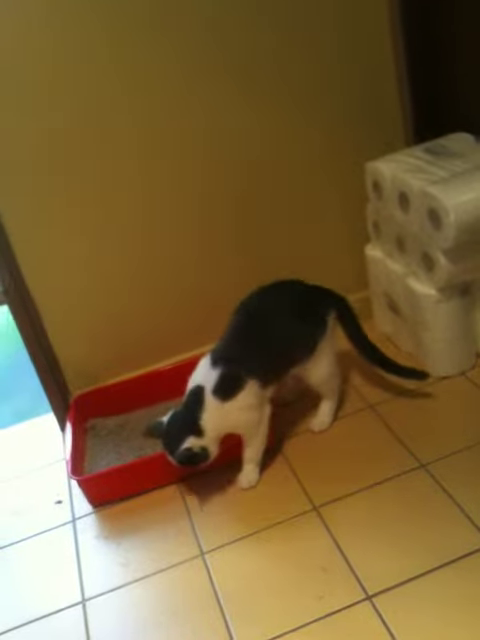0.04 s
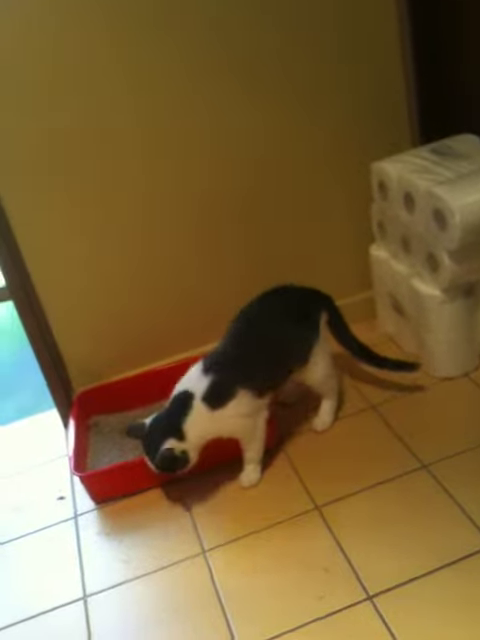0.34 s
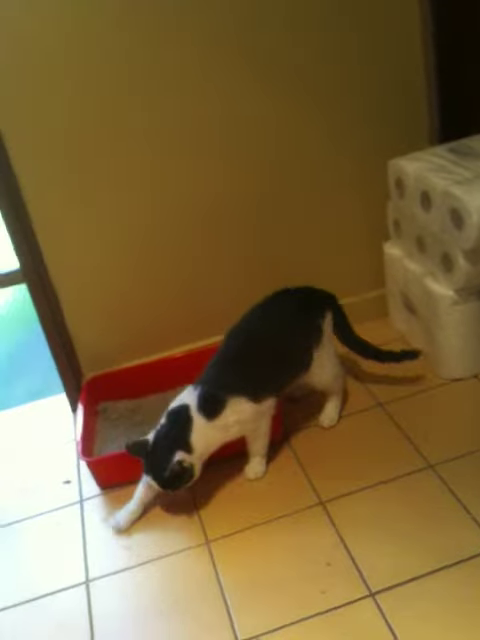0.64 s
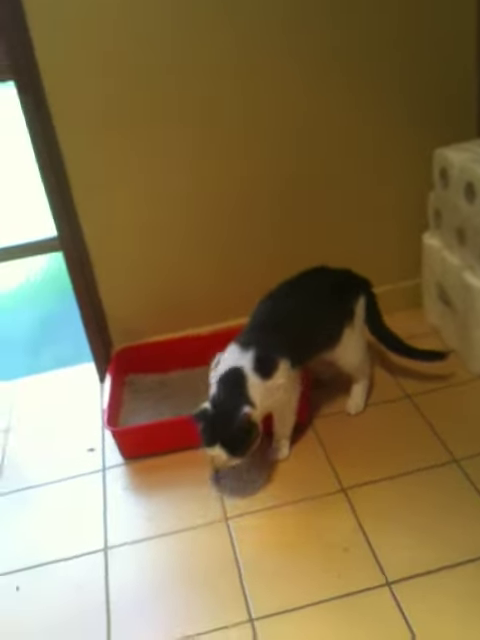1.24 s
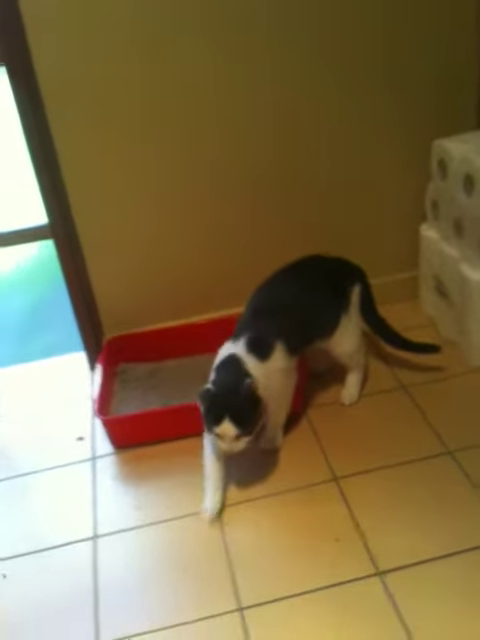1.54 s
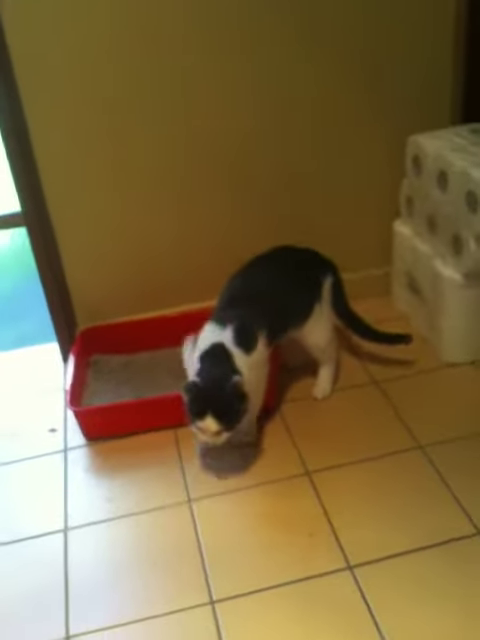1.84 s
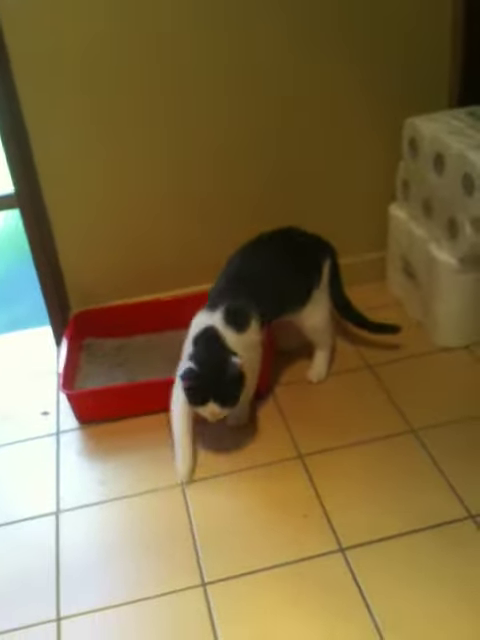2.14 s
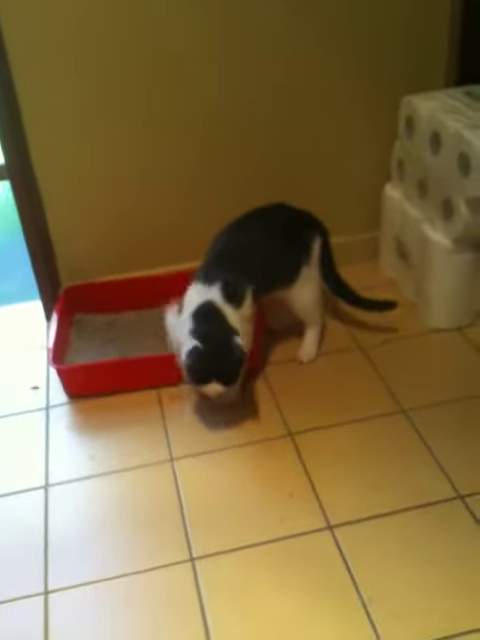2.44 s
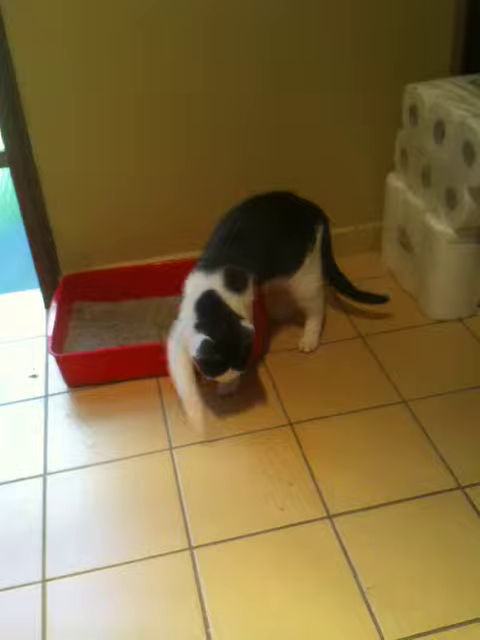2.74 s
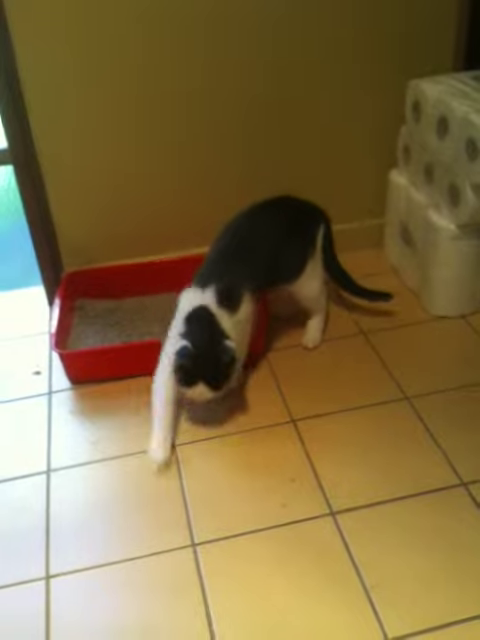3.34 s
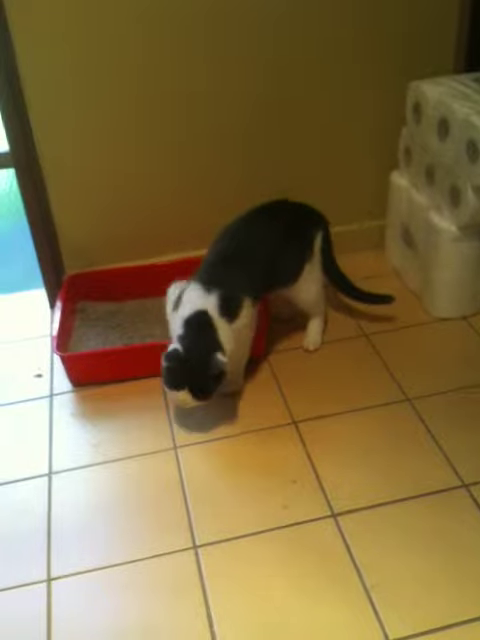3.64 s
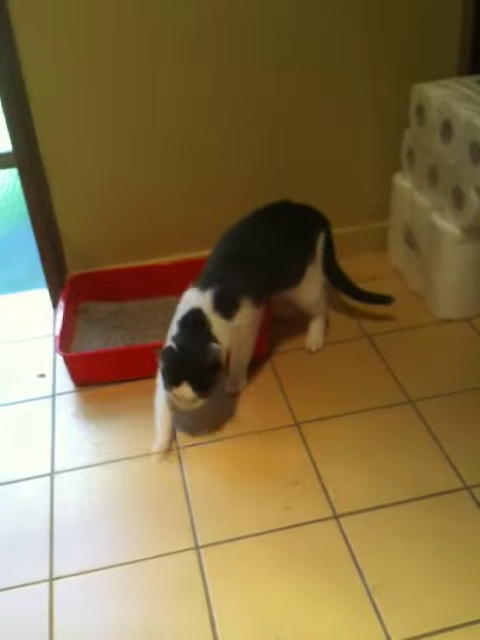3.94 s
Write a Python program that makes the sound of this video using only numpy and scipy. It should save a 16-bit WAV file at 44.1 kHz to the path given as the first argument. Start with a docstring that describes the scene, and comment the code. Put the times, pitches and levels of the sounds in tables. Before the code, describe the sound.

A cat's paw scraping a tiled floor and knocking against a plastic litter tray.

```python
"""Cat pawing beside a litter tray

A cat swipes a front paw over a tiled floor in a small hard room. Each swipe is a faint brush as the
leg reaches out, a hollow knock as the returning paw excites the modes of the plastic tray, and a short
gritty scrape of friction. Soft footfalls and one dull tap lie over quiet room noise and hiss."""
import sys
import numpy as np
from scipy import signal
from scipy.fft import rfft
from scipy.io import wavfile
from scipy.ndimage import uniform_filter1d

SR = 44100
rng = np.random.default_rng(int(sys.argv[2]) if len(sys.argv) > 2 else 0)


def digitize_waveform(pressure):
    """Quantize a signal to 16-bit integers and store it at the path in sys.argv[1].

    Rows of a 2-D input are taken as channels; values are limited to [-1, 1].
    """
    field = np.atleast_2d(pressure).T
    bounded = np.clip(field, -1, 1)
    quanta = np.round(bounded * 32767).astype(np.int16)
    wavfile.write(sys.argv[1], SR, quanta)


N = 176400


def amp(db):
    """Amplitude ratio: a factor of ten for every 20 dB."""
    return 10 ** (np.asarray(db) / 20)


def unit_rms(x):
    """Normalisation to unit mean power."""
    return x / np.sqrt(np.mean(x ** 2) + 1e-30)


def unit_energy(x):
    """Normalisation to a unit sum of squares."""
    return x / np.linalg.norm(x)


def curve_at(points, hz):
    """Linear interpolation on a logarithmic frequency axis."""
    frequencies, values = np.transpose(points)
    return np.interp(np.log(hz + 1), np.log(frequencies), values)


def add(mix, start_s, sound):
    """Superposition: a sound joins the mix at its start time."""
    part = mix[max(round(start_s * SR), 0):][:len(sound)]
    part += sound[:len(part)]


def colour(x, spectrum, size=4096):
    """Minimum-phase filtering: a causal response of unit energy imposes the spectral shape."""
    log_gain = np.log(amp(curve_at(spectrum, abs(np.fft.fftfreq(size, 1 / SR)))))
    response = np.exp(np.conj(signal.hilbert(log_gain)))
    taps = np.fft.ifft(response).real[:size // 2]
    return signal.fftconvolve(x, unit_energy(taps))[:len(x)]


# Spectrum of the room noise. Each row: frequency in Hz, relative level in dB.
NOISE_SPECTRUM = [(20, -45.5), (50, -30), (90, -9), (125, -5), (175, 1.5), (260, -1), (400, -6), (600, -6),
                  (900, -12), (1600, -15.5), (2000, -14), (2200, -10), (2700, -18), (3400, -18),
                  (4500, -23), (7000, -24), (10000, -24), (15500, -25)]


def room_noise(level_db=-68, waver_db=0.5):
    """Amplitude modulation: steady room noise and hiss waver slightly in level."""
    waver = unit_rms(uniform_filter1d(rng.standard_normal(N), size=6000))
    return amp(level_db + waver_db * waver) * colour(rng.standard_normal(N), NOISE_SPECTRUM)


# Spectrum of the tap. Each row: frequency in Hz, relative level in dB.
TAP_SPECTRUM = [(40, -43), (110, -14), (180, 2), (350, -2.5), (700, -8), (1200, -17), (2000, -28),
                (6000, -62)]


def tap(start_s=0.6095, level_db=-61):
    """Impulse response: one damped pulse close by, dull and without reverberation."""
    pulse = np.zeros(N)
    add(pulse, start_s, amp(level_db) * unit_rms(signal.unit_impulse(SR // 10)))
    return colour(pulse, TAP_SPECTRUM)


# Footfalls. Each row: start in seconds, level in dB.
FOOTFALLS = [(.645, -63.5), (0.919, -58), (1.123, -63), (1.161, -65), (2.788, -65)]
# Spectrum of a footfall. Each row: frequency in Hz, relative level in dB.
FOOTFALL_SPECTRUM = [(50, -36), (120, -14), (175, 3), (300, -10), (600, -50), (3000, -44)]


def footfalls(decay_s=0.045):
    """Cushioned impact: the pads make low, exponentially dying thuds as the cat shifts its weight."""
    t, thuds = np.arange(SR // 4) / SR, np.zeros(N)
    for start_s, db in FOOTFALLS:
        add(thuds, start_s, amp(db) * rng.standard_normal(len(t)) * np.exp(-t / decay_s))
    return colour(thuds, FOOTFALL_SPECTRUM)


def swell(peak_s, half_s):
    """Gaussian envelope of a stroke's pressure; the half length is one standard deviation."""
    return np.exp(-0.5 * ((np.arange(N) / SR - peak_s) / half_s) ** 2)


# Brushing strokes. Each row: peak time in seconds, half length in seconds, level in dB.
BRUSHES = [(0.798, 0.041, -71), (1.21, 0.036, -67.5), (1.46, 0.2, -69.5), (1.69, 0.031, -94),
           (1.834, 0.042, -66), (2.441, 0.055, -69), (3.03, 0.049, -71.5), (3.646, 0.049, -67)]
# Spectrum of the brushing. Each row: frequency in Hz, relative level in dB.
BRUSH_SPECTRUM = [(100, -27), (400, -0.5), (1000, -3), (1500, -3.5), (2000, -1), (2450, 0.5), (3000, -6),
                  (3500, -5.5), (4500, -19.5), (15000, -25)]


def brushes():
    """Friction noise: fur and pads rub faintly, in proportion to the pressure of each stroke."""
    pressure = sum(amp(db) * swell(peak_s, half_s) for peak_s, half_s, db in BRUSHES)
    return colour(rng.standard_normal(N), BRUSH_SPECTRUM) * pressure


def mode(t, hz, t60):
    """Damped oscillation: a sinusoid that falls 60 dB in t60 seconds."""
    return np.sin(2 * np.pi * hz * t) * np.exp(-np.log(1000) * t / t60)


# Modes of the plastic tray. Each row: frequency in Hz, relative level in dB, T60 in seconds.
TRAY_MODES = [(295, -5, 0.26), (336, -1.5, 0.28), (375, 3.5, 0.2), (525, -3, 0.35), (586, 2.5, 0.19),
              (645, 0, 0.31), (765, -1, 0.25), (880, -8, 0.37), (958, -9, 0.27), (1131, -8.5, 0.32),
              (1348, -5.5, .26), (1690, -8, 0.23), (2260, -8.5, 0.25), (2394, -7.5, 0.36)]
# Standing waves of the room. Each row: frequency in Hz, relative level in dB, T60 in seconds.
ROOM_MODES = [(149.4, -8, 0.44), (185.3, -6.5, 0.3), (216.6, -6, 0.44), (242, -16, 0.4), (422, -5, 0.1),
              (498, -2, 0.17), (687.7, 1, 0.19), (816, -15, 0.22), (1083, 0, 0.12), (1250, -20, 0.15),
              (1440, -6, .25), (1510, -32, 0.31), (1602, -7.5, 0.15), (1790, -12.5, 0.36)]


def ringing():
    """Modal superposition: tray modes start in phase; adjacent room modes start opposed, then swell."""
    t = np.arange(SR // 2) / SR
    tray = [amp(db) * mode(t, hz, t60) for hz, db, t60 in TRAY_MODES]
    room = [amp(db) * mode(t, hz, t60) for hz, db, t60 in ROOM_MODES]
    return unit_energy(sum(tray) + sum(room[::2]) - sum(room[1::2]))


# Reverberation time of the room. Each row: frequency in Hz, T60 in seconds.
ROOM_T60 = [(120, 0.7), (350, 0.29), (900, 0.26), (2400, 0.36), (6000, 0.45), (14000, 0.2)]


def room_tail():
    """Reverberation: half a second of dense reflections, each band decaying at its own rate."""
    hz, t, bands = signal.stft(rng.standard_normal(SR // 2), SR, nperseg=256)
    decay = np.exp(-np.log(1000) * t / curve_at(ROOM_T60, hz)[:, None])
    _, tail = signal.istft(bands * decay, SR, nperseg=256)
    return unit_energy(tail[:SR // 2])


def contact_noise(t, decay_s):
    """Broadband excitation: a brief contact gives exponentially dying noise of unit energy."""
    return unit_energy(rng.standard_normal(len(t)) * np.exp(-t / decay_s))


def rebound(t, delay_s=0.051, half_s=0.0088, centre_hz=227, fall_hz_per_s=1700):
    """Downward chirp: the tray rocks back after a knock with a soft thud of falling pitch."""
    lag = t - delay_s
    cycles = lag * (centre_hz - 0.5 * fall_hz_per_s * lag) + rng.random()
    return np.exp(-0.5 * (lag / half_s) ** 2) * np.sin(2 * np.pi * cycles)


# The seven bands of a knock. Each entry: band edge in Hz.
BAND_EDGES_HZ = [120, 250, 450, 850, 1500, 2800, 5000, 15000]


def equalise(blow, band_db, size=3600, passes=2):
    """Equalisation: smooth filters bring the first 80 ms of a blow towards the given band levels."""
    edges = np.array(BAND_EDGES_HZ)
    centres = np.sqrt(edges[1:] * edges[:-1])
    edge_bins = (edges * size / SR).astype(int)
    for _ in range(passes):
        band_power = np.add.reduceat(abs(rfft(blow[:size])) ** 2, edge_bins)[:-1]
        gain_db = band_db - 10 * np.log10(band_power)
        blow = colour(blow, np.transpose([centres, gain_db]))
    return blow / blow[:size].std() * np.linalg.norm(amp(band_db))


# Dense ringing beneath the tray's modes. Each row: frequency in Hz, relative level in dB.
BODY_SPECTRUM = [(70, -35.5), (150, -7.5), (220, -14.5), (400, -2.5), (600, -0.5), (1000, -7), (2300, -14),
                 (3500, -17), (4500, -23.5), (5800, -29.5), (10000, -26), (15000, -31.5)]
# Paw knocks. Each row: start in seconds, low and high pitch of the struck spot in Hz, their two
# relative levels in dB, push level in dB, rebound level in dB, then seven band levels in dB.
KNOCKS = [(0.8853, 386, 1870, 4, -10, -88, -70, -78, -67.5, -66.5, -79, -71.5, -79.5, -78),
          (1.3213, 931, 1308, -4.5, -9, -87, -46, -51, -52, -46, -50.5, -60, -69, -74.5),
          (1.9344, 395, 1097, 0, -17, -67, -53, -57, -39, -50, -52.5, -57, -67.5, -73),
          (2.556, 533, 1150, -13, -6, -68, -42, -51.5, -39.5, -44, -48, -49.5, -60, -68.5),
          (3.1181, 394, 2324, -2.5, -6, -63, -40.5, -49, -37.5, -42.5, -48.5, -46.5, -56, -67),
          (3.729, 711, 1743, 1, -11, -69, -42.5, -50.5, -42.5, -42, -46, -47.5, -59, -66.5)]


def knocks(attack_s=0.0017, spot_t60=0.12, bass_cut_hz=157, push_hz=50, push_s=0.007):
    """Impact excitation: a slap and a rough contact ring tray and room, each blow on another spot."""
    t, out = np.arange(SR // 2) / SR, np.zeros(N)
    ring, reflections = ringing(), room_tail()
    bass_cut = signal.butter(3, bass_cut_hz, "high", fs=SR, output="sos")
    onset = 1 - np.exp(-t / attack_s)
    push = np.sin(2 * np.pi * push_hz * t) * t / push_s * np.exp(1 - t / push_s)  # paw on the floor
    for start_s, low_hz, high_hz, low_db, high_db, push_db, rebound_db, *band_db in KNOCKS:
        contact = amp(-1.5) * contact_noise(t, decay_s=0.023)
        slap = amp(-11.5) * contact_noise(t, decay_s=0.0057)
        body = colour(reflections + contact + slap, BODY_SPECTRUM)
        spot_low = amp(low_db) * unit_energy(mode(t, low_hz, spot_t60))
        spot_high = amp(high_db) * unit_energy(mode(t, high_hz, spot_t60))
        tones = amp(1.5) * ring + spot_low + spot_high
        blow = equalise(signal.sosfilt(bass_cut, tones * onset + body), np.array(band_db))
        add(out, start_s, blow + amp(push_db) * push + amp(rebound_db) * rebound(t))
    return out


def slips(per_s=2100, spread_db=4):
    """Stick-slip friction: a dense random train of tiny impulses of uneven size."""
    size = amp(spread_db * np.minimum(rng.exponential(1, N), 4))
    polarity = rng.choice([-1, 1], N)
    slipping = rng.random(N) < per_s / SR
    return unit_rms(size * polarity * slipping)


# Scrapes. Each row: peak time in seconds, half length in seconds, pad, claw and grit levels in dB.
SCRAPES = [(0.908, 0.0089, -57, -68, -72.5), (1.429, 0.023, -58.5, -64.5, -76.5),
           (2.04, 0.024, -61, -65.5, -74), (2.674, 0.018, -55, -63.5, -67), (3.229, 0.014, -51, -70, -70.5),
           (3.811, 0.013, -59.5, -62, -75), (3.857, 0.025, -57.5, -61, -71.5)]
# Spectra of pad, claws and grit. Each row: frequency in Hz, relative level in dB.
PAD_SPECTRUM = [(60, -24.5), (180, -13.5), (300, -2.5), (400, 3), (550, -7.5), (750, -0.5), (1300, -9.5),
                (1800, -19), (4000, -34.5), (15000, -58)]
CLAW_SPECTRUM = [(300, -42), (1200, -10), (1900, -1), (2450, 3.5), (2950, -5), (3500, -3.5), (4500, -15.5),
                 (7000, -24), (15000, -33)]
GRIT_SPECTRUM = [(500, -14), (3000, -11), (6000, -1.5), (10000, 1), (15000, -2.5)]


def scrapes(reverb_db=-7, ring_db=-17.5):
    """Sliding friction: the pad drags on tile, claws rasp and catch on grit; room and tray resonate."""
    direct = np.zeros(N)
    for layer, spectrum in enumerate([PAD_SPECTRUM, CLAW_SPECTRUM, GRIT_SPECTRUM]):
        pressure = sum(amp(db[layer]) * swell(peak_s, half_s) for peak_s, half_s, *db in SCRAPES)
        direct += colour(slips() * pressure, spectrum)
    response = amp(reverb_db) * room_tail() + amp(ring_db) * ringing()
    return direct + signal.fftconvolve(direct, response)[:N]


def scene():
    """Linear superposition: the pressures of all sources add in one channel."""
    return (knocks() + scrapes() + brushes() + footfalls() + tap() + room_noise())[None]


def record(dry):
    """Band limiting: a steep windowed-sinc low-pass removes the treble above 15850 Hz."""
    low_pass = signal.firwin(511, 15850, window=("kaiser", 9), fs=SR)
    return signal.oaconvolve(dry, low_pass[None], "same")


dry = scene()
out = record(dry)
digitize_waveform(out)
```